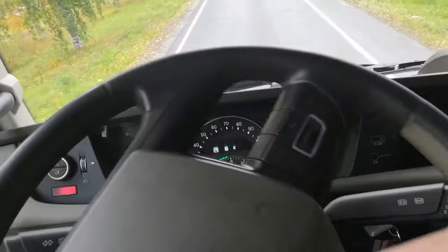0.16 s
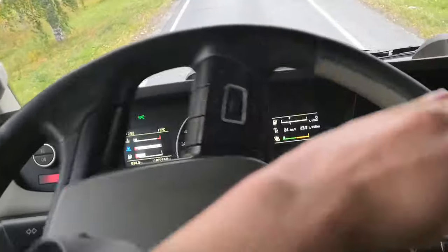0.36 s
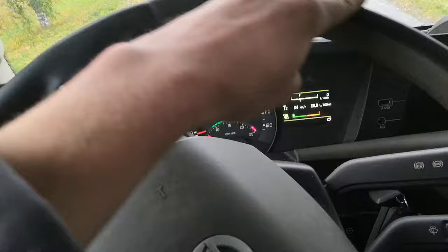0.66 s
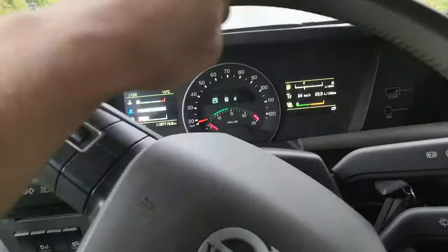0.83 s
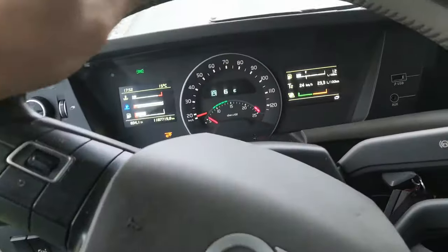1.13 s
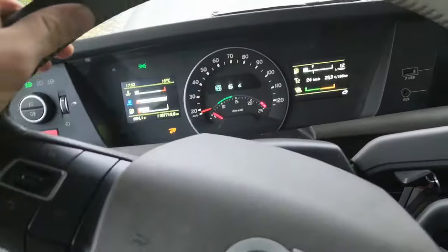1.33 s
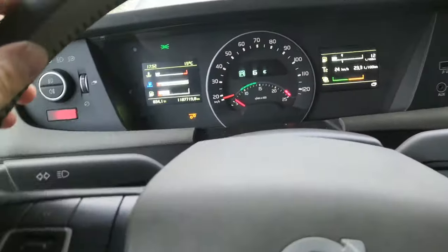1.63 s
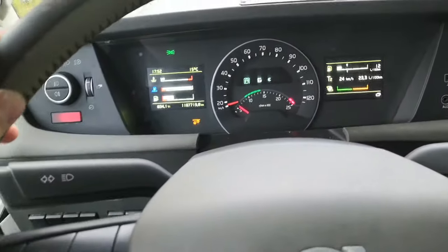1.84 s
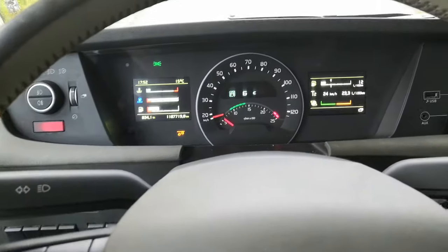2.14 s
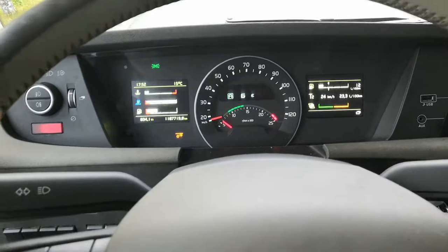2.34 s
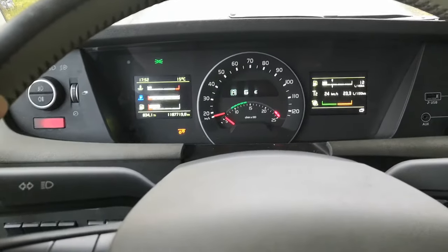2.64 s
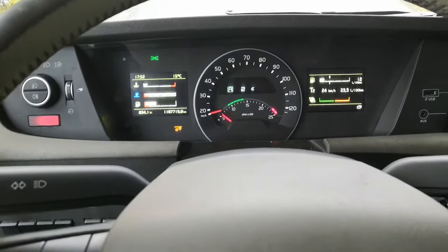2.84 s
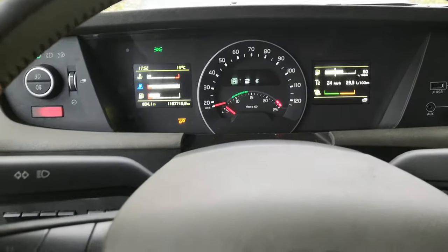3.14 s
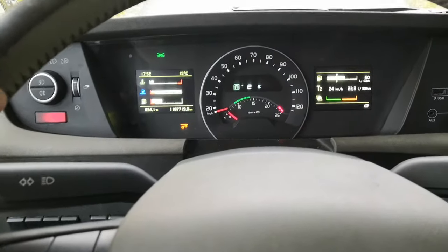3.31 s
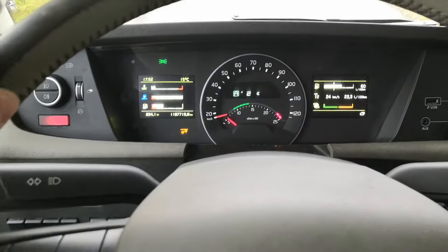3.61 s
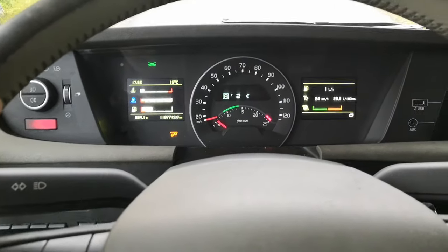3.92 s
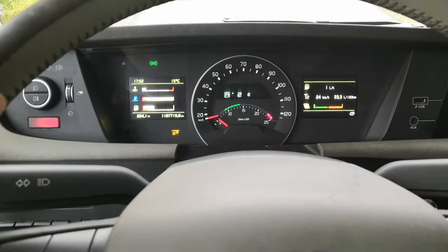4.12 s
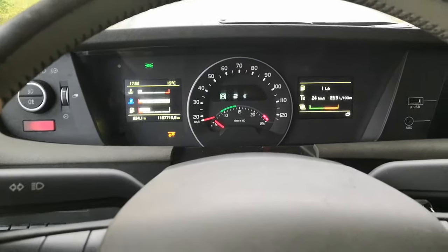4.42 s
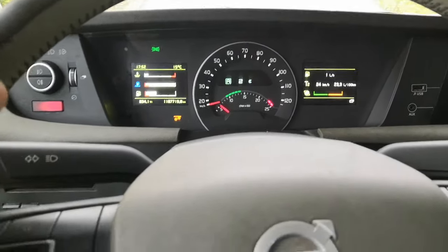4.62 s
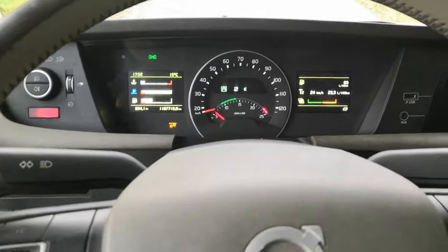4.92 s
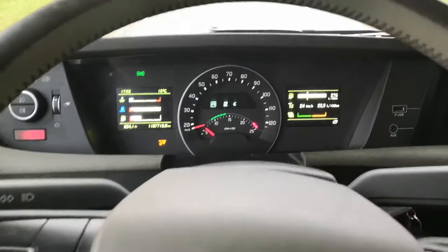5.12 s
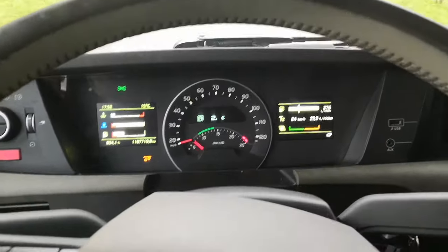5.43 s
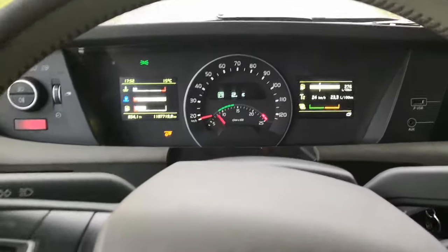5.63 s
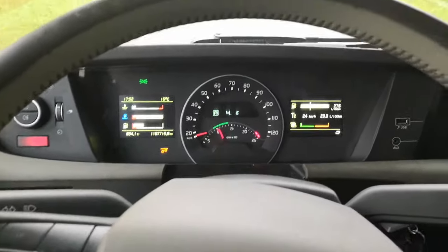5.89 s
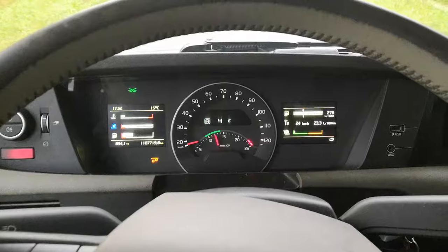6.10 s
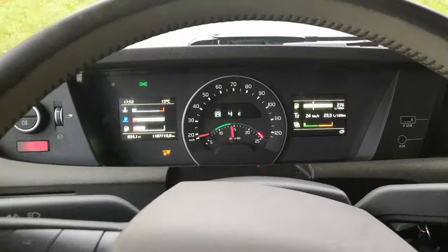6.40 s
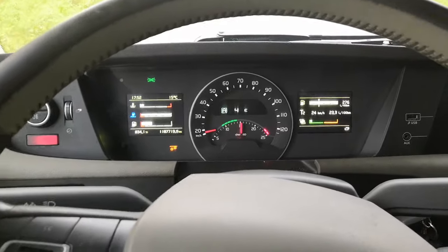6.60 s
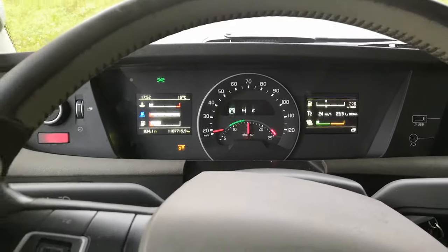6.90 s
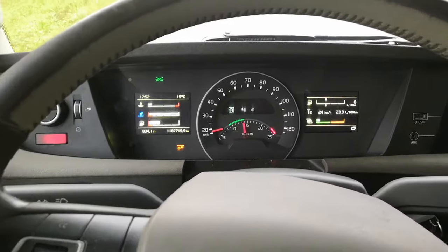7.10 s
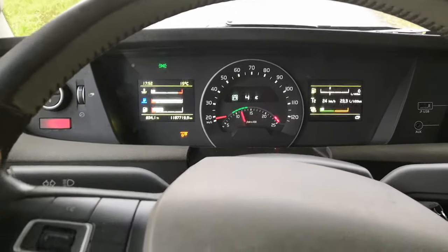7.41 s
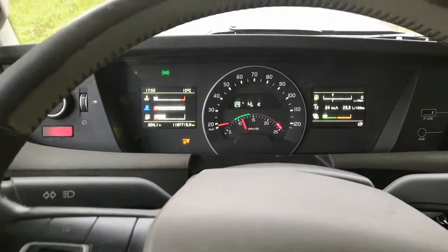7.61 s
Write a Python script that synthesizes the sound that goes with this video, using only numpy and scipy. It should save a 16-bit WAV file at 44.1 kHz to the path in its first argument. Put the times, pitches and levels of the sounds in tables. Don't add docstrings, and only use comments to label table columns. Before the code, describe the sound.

Inside a heavy truck cab, a six-cylinder diesel idles low and lumpy over soft rumble and a steady pump hum. Hands swish on the wheel, a small air puff spits, gear dogs clunk dully. Then the engine rises quickly, booming and knocking, drops for an upshift and climbs again. A sharp finger tap hits the handheld microphone near the left side late on.

```python
import sys
import numpy as np
from scipy import signal
from scipy.io import wavfile
from scipy.ndimage import uniform_filter1d

SR = 44100
rng = np.random.default_rng(int(sys.argv[2]) if len(sys.argv) > 2 else 0)


def file_out(sig):
    cols = np.atleast_2d(sig).T
    lim = np.clip(cols, -1, 1)
    pcm = np.round(lim * 32767).astype(np.int16)
    wavfile.write(sys.argv[1], SR, pcm)


def linear_from_db(decibels):
    return 10 ** (np.asarray(decibels, float) / 20)


N = 341775
T = np.arange(N) / SR


def colour(table, hz):
    f, db = np.transpose(table)
    return np.interp(np.log(np.maximum(hz, 1)), np.log(f), db)


def curves(table):
    s, *columns = np.transpose(table)
    return [np.interp(T, s, c) for c in columns]


def swells(rows):
    return sum(db * np.exp(-((T - s) / length) ** 2) for s, length, db in rows)


def resonance(hz, centre_hz, width_hz):
    return 1 / (1 + ((hz - centre_hz) / (width_hz / 2)) ** 2)


def walk(rate_hz, count):
    k = int(SR / rate_hz)
    held = np.repeat(rng.standard_normal((count, N // k + 1)), k, axis=1)
    slewed = uniform_filter1d(uniform_filter1d(held, k), k)[:, :N]
    return slewed / slewed.std()


def ports(spectrum, modes=(), patchy_db=0.5, size=15, balance=None):
    # frequency in Hz, level in dB.
    side_db = [(60, -28), (110, -21), (200, -17), (380, -6), (700, 4), (1290, 0), (2380, 0), (4400, 0),
               (8120, 0), (15000, 1)]
    # frequency in Hz, level in dB.
    far_balance = [(60, 0.0), (110, 0.0), (200, 0.0), (380, 0.0), (700, 1.0), (1290, -2.0), (2380, -4.5),
                   (4400, -2.0), (7000, -5), (10000, 3), (15000, 0.5)]
    if balance is None:
        balance = far_balance
    frame, overlap = 2048, 1792
    hz, _, z = signal.stft(rng.standard_normal((2, N)), SR, nperseg=frame, noverlap=overlap)
    outside = (hz < spectrum[0][0]) | (hz > spectrum[-1][0])
    db = colour(spectrum, hz) - 80 * outside
    db = db + sum(gain_db * resonance(hz, f, width) for f, width, gain_db in modes)
    patches = uniform_filter1d(rng.standard_normal(z[0].shape), size=size, axis=0)
    patches = uniform_filter1d(patches, size=21, axis=1)
    mid = z[0]
    side = z[1] * linear_from_db(colour(side_db, hz))[:, None]
    lean = linear_from_db(colour(balance, hz) / 2)[:, None]
    pair = np.array([(mid + side) * lean, (mid - side) / lean])
    pair = pair * linear_from_db(db[:, None] + patchy_db * patches / patches.std())
    out = signal.istft(pair, SR, nperseg=frame, noverlap=overlap)[1][:, :N]
    return out / out.mean(axis=0).std()


def lines(tables, wander_db, rate_hz, edge_s=0.045):
    out = np.zeros(N)
    for table, wander in zip(tables, walk(rate_hz, count=len(tables))):
        s, hz, db = np.transpose(table)
        gate = np.clip(np.minimum(T - s[0], s[-1] - T) / edge_s + 1, 0, 1)
        level = linear_from_db(np.interp(T, s, db) + wander_db * wander)
        out += gate * level * np.sin(2 * np.pi * np.cumsum(np.interp(T, s, hz)) / SR)
    return np.sqrt(2) * out


def glides(rows):
    return [[(a, hz0, db), (b, hz1, db)] for a, b, hz0, hz1, db in rows]


def order(k, turns, start=0.0):
    return np.sin(2 * np.pi * (k * turns + start))


def multiples(hz, effort_db):
    # frequency in Hz, width in Hz, lift in dB.
    panels = [(85, 14, 6), (98.5, 14, 15), (159.6, 22, 10.5)]
    levels_db = []
    # multiple, dB at idle, dB per dB of effort, share of the panel lift
    laws = ((3 / 2, -60, 1.4, 0.3), (2, -58, 0.84, 0.97))
    for (k, idle_db, slope, share), waver in zip(laws, walk(9, count=2)):
        lift_db = sum(db * resonance(k * hz, f, width) for f, width, db in panels)
        levels_db.append(idle_db + slope * effort_db + 2.2 * waver + share * lift_db)
    return levels_db


def firing(hz, turns, tone_db, effort_db, clatter_db, lope):
    # centre in seconds, length in seconds, firing tone gain in dB.
    surges = [(.05, 0.11, -10), (.3, .05, 5), (.68, 0.087, -12), (1.55, 0.13, 4), (1.95, 0.19, -3),
              (2.19, 0.045, 4), (2.42, 0.042, 8), (3.0, 0.22, -1.5), (3.5, 0.053, 5), (5.72, .04, -5),
              (5.9, .05, -4), (6.0, .03, 2)]
    # multiple of the firing rate, level in dB against the clatter.
    orders = [(0.499, -5), (2.501, 4), (2.667, 12), (3.001, 0.5), (3.5, 0), (4, 3), (4.501, -2.5),
              (5.002, -7)]
    # frequency in Hz, gain in dB.
    cab_gain = [(20, -2), (150, 9), (210, -16), (260, -4), (310, -22), (420, 2.5)]
    tones_db = [tone_db + 4 * lope + swells(surges), *multiples(hz, effort_db)]
    out = sum(linear_from_db(db) * order(k, turns) for k, db in zip((1, 3 / 2, 2), tones_db))
    load_db = clatter_db + 1.21 * (clatter_db + 32.0)
    count = len(orders)
    for (k, db), wander, start in zip(orders, walk(7, count), rng.random(count)):
        out += linear_from_db(load_db + db + colour(cab_gain, k * hz) + 2.0 * wander) * order(k, turns, start)
    return np.sqrt(2) * out


def idle_orders(turns):
    # multiple of the firing rate, level in dB.
    comb = [(2.333, -61), (2.5, -57), (2.667, -58), (3, -61), (4, -64), (5, -66), (5.667, -64), (6.4, -60),
            (7.4, -67), (7.85, -65), (8.333, -67), (8.5, -67), (9.667, -71), (10, -69), (11, -71),
            (12.5, -71)]
    ends_s, fade_s = 4.5, .4
    fade = np.clip((ends_s - T) / fade_s + 1, 0, 1)
    out = np.zeros(N)
    for (k, db), wander, start in zip(comb, walk(3, len(comb)), rng.random(len(comb))):
        out += linear_from_db(db + 2.5 * wander) * order(k, turns, start)
    return np.sqrt(2) * fade * out


def crossings(turns):
    # multiple of the firing rate, centre in seconds, length in seconds, level in dB.
    passes = [(3.06, 4.85, .3, -49), (2.5, 4.95, .2, -51), (3, 5.5, .12, -45), (4, 5.5, .2, -49),
              (5, 5.65, .25, -52), (6.2, 5.6, .25, -52), (6.55, 5.62, .1, -50), (3.47, 5.76, .09, -43),
              (4.1, 5.87, .05, -44), (3.54, 6.1, .18, -45), (2, 6.35, .2, -48), (2.67, 6.1, .12, -48),
              (3.53, 6.92, .15, -45), (3.55, 7.3, .3, -48), (3.5, 7.68, .1, -45), (5.33, 7.3, .12, -54)]
    count = len(passes)
    out = np.zeros(N)
    for (k, s, length, db), wander, start in zip(passes, walk(8, count), rng.random(count)):
        out += linear_from_db(db + 2.6 * wander) * np.exp(-((T - s) / length) ** 4) * order(k, turns, start)
    return np.sqrt(2) * out


def combustion(turns, clatter_db, effort_db):
    # frequency in Hz, density in dB per Hz.
    idle_colour = [(500, -12.5), (850, -6), (1110, -6), (1280, -6), (1540, -6.5), (1940, -6.5),
                   (2090, -7.5), (2820, -12.5), (3230, -22), (3490, -21.5), (4000, -30), (5200, -66),
                   (8800, -120)]
    pull_colour = [(500, -20), (850, -4), (968, -0.5), (1160, -5.5), (1300, -1.5), (1420, -7.5), (1610, -3),
                   (1830, -4.5), (2430, -6), (3030, -17.5), (4000, -25), (5200, -43), (8800, -120)]
    hiss_colour = [(1940, -41), (3300, -13), (3450, -1.5), (3760, -4.5), (4290, -4), (5010, -3), (5250, -3),
                   (5690, -3), (6190, -6.5), (6320, -9), (6850, -4.5), (8590, -13.5), (11000, -16.5),
                   (14300, -29), (22000, -120)]
    # frequency in Hz, width in Hz, dB over the clatter.
    idle_rings = [(1290, 45, 4), (1620, 50, 5), (1905, 30, 7), (1955, 30, 8)]
    pull_rings = [(1290, 60, 2), (1615, 80, 4), (2480, 90, 3)]
    cylinder_gain = linear_from_db(2.5 * rng.standard_normal(int(turns[-1]) + 2))
    strength = cylinder_gain[turns.astype(int)]
    knock = 1 + 0.92 * strength * np.exp(-(turns % 1) / 2.6)
    load = np.clip((clatter_db + 58) / 7, 0, 1)
    idle = ports(idle_colour, idle_rings, patchy_db=.9)
    pull = ports(pull_colour, pull_rings, patchy_db=.9)
    block = (np.sqrt(1 - load) * idle + np.sqrt(load) * pull) * knock
    hiss_db = -77.5 + 0.66 * effort_db
    hiss = ports(hiss_colour, patchy_db=.4)
    return linear_from_db(clatter_db) * block / block.mean(axis=0).std() + linear_from_db(hiss_db) * hiss


def mesh(hz, turns):
    # centre in seconds, length in seconds, gain in dB.
    tooth_load = [(5.73, .06, 8), (5.92, .04, 8), (6.8, .06, -8), (6.905, .015, 5), (6.955, .025, 6),
                  (7.02, .025, -6), (7.09, .025, 8), (7.15, .02, -7), (7.26, .06, 1), (7.41, .06, -10),
                  (7.52, .025, 8), (7.555, .012, -4), (7.59, .03, 6), (7.645, .015, -5), (7.69, .04, 6)]
    teeth = 42.3
    ring = resonance(teeth * hz, 2470, 460)
    level = linear_from_db(-68.5 + swells(tooth_load) + 1.6 * walk(25, count=1)[0])
    return np.sqrt(2) * level * ring * order(teeth, turns)


def whistles(hz, turns):
    # start in seconds, end in seconds, start in Hz, end in Hz, level in dB.
    whine = [(6.15, 6.62, 2450, 2460, -69)]
    # time in seconds, frequency in Hz, level in dB.
    squeak = [
        [(5.03, 5700, -90), (5.09, 6200, -88), (5.13, 6600, -83), (5.16, 6950, -80), (5.2, 6760, -81),
         (5.24, 7080, -79), (5.285, 6580, -79)],
    ]
    turbine = [
        [(6.78, 5340, -88), (6.86, 5390, -84), (6.88, 5380, -86)],
        [(7.14, 5420, -86), (7.19, 5720, -87), (7.215, 5830, -85), (7.25, 5600, -89)],
    ]
    tones = lines(glides(whine) + squeak + turbine, wander_db=2.2, rate_hz=30, edge_s=.012)
    return (tones + mesh(hz, turns)) * linear_from_db(np.array([[2], [4.5]]))


def shaft():
    # start in seconds, end in seconds, start in Hz, end in Hz, level in dB.
    bites = [(6.38, 6.56, 204, 209, -42), (7.17, 7.52, 218.9, 218.9, -46), (7.1, 7.55, 144.7, 144, -46),
             (7.15, 7.55, 251, 251, -50)]
    return lines(glides(bites), wander_db=1.5, rate_hz=8.2)


def shudder():
    # frequency in Hz, density in dB per Hz.
    pan_colour = [(300, -20), (335, -4), (365, 0), (395, -1), (425, -20)]
    centre_s, length_s, db = 5.56, .2, -47
    return ports(pan_colour, size=3) * linear_from_db(db) * np.exp(-((T - centre_s) / length_s) ** 2)


def strike(hits, modes, contact_s):
    t = T[:SR // 4]
    blows = sum(linear_from_db(db) * np.exp(-((T - s) / .0002) ** 2) / 16 for s, db in hits)
    out = []
    for lag_s in (0, -.0004):
        ring = np.zeros(len(t))
        for hz, db, t60 in modes:
            decay = np.exp(-np.log(1000) * t / t60) * (1 - np.exp(-t / contact_s))
            ring += linear_from_db(db) * decay * np.sin(2 * np.pi * hz * (t + lag_s))
        out.append(signal.fftconvolve(blows, ring)[:N])
    return np.array(out)


def clunk():
    # time in seconds, level in dB.
    dogs = [(3.2028, -48), (3.2145, -42), (3.2204, -39), (3.2322, -41), (3.2439, -42), (3.2616, -41)]
    lid_blows = [(3.2145, -38), (3.26, -45)]
    # frequency in Hz, level in dB, t60 in seconds.
    box_modes = [(168, 0, .17), (184, 0, .12), (215, -5, .1), (610, -10, .06), (680, -19, .05),
                 (750, -18, .05), (940, -8, .04), (1450, -8, .03), (1900, -8, .025)]
    lid_modes = [(185, 0, .15), (232, -4, .15), (258, -3, .15), (308, 0, .2), (388, -9, .15),
                 (443, -5, .12), (470, -10, .1), (515, -10, .1), (535, -9, .12), (672, -13, .1),
                 (945, -13, .08)]
    return strike(dogs, box_modes, contact_s=.0003) + strike(lid_blows, lid_modes, contact_s=.006)


def close_air():
    # frequency in Hz, width in Hz, lift in dB.
    nozzle = [(3580, 760, 7), (5000, 5100, 9), (7500, 520, 9), (9550, 710, 3.5)]
    # frequency in Hz, level in dB.
    near_balance = [(1200, -2), (4500, -3.5), (7000, -8.5), (8300, 1), (10000, 18), (12500, 3), (15800, 5)]
    jet_colour = [(1200, -3), (4000, 0), (11000, -2), (15800, -9)]
    air = ports(jet_colour, nozzle, patchy_db=1.2, balance=near_balance)
    return air * linear_from_db(2.0 * walk(350, count=1))


def bursts(air, rows, octaves, rise_s=None):
    out = np.zeros((2, N))
    for s, length, db, hz, pan_db in rows:
        a, b = max(int((s - .6) * SR), 0), min(int((s + .6) * SR), N)
        t = T[a:b] - s
        swell = np.exp(-(t / np.where(t < 0, rise_s or length, length)) ** 2)
        steepness = 5 if hz < 3000 else 2
        edges_hz = [hz / 2 ** (octaves / 2), hz * 2 ** (octaves / 2)]
        band = signal.butter(steepness, edges_hz, "band", fs=SR, output="sos")
        jet = signal.sosfilt(band, air[:, a:b])
        pan = np.array([[pan_db], [-pan_db]]) / 2
        out[:, a:b] += jet / jet.std() * swell * linear_from_db(db + 9.5 + pan)
    return out


def puffs(air):
    # centre in seconds, length in seconds, level in dB, centre in Hz, left minus right in dB.
    vents = [(0.17, 0.06, -79, 4840, -14), (0.16, 0.088, -86, 8400, 9), (0.51, 0.17, -83.5, 5500, -2),
             (1.751, .009, -63.5, 7500, 6), (1.752, .009, -65, 4890, 2), (1.785, .014, -66.5, 4800, 0),
             (1.767, .006, -72, 5200, 0), (1.767, .006, -72, 7400, 0), (1.783, .014, -66, 7600, 0),
             (1.76, .012, -69, 3700, 4), (1.793, .01, -70, 3800, 4), (1.803, .005, -71, 7400, 0),
             (1.765, .025, -74, 9400, 0), (1.765, 0.067, -70.5, 2170, -2), (3.19, 0.018, -69.5, 6000, 0),
             (4.6, 0.042, -80, 7300, -1), (5.3, 0.01, -72, 2420, 1), (.122, .004, -76, 4500, -8),
             (.138, .005, -80, 4600, -6), (.2, .022, -80, 5200, -7), (0.096, .012, -81, 5000, -8),
             (1.718, .014, -76, 7700, 0), (1.717, 0.008, -78, 4500, -4), (8.3, .06, -69, 2460, 0)]
    return bursts(air, vents, octaves=0.29)


def hands(air):
    # centre in seconds, length in seconds, level in dB, centre in Hz, left minus right in dB.
    swishes = [(0.167, 0.22, -78.5, 4900, -7.5), (5.35, 0.17, -80, 5940, -2),
               (1.066, .025, -81.5, 8400, -1), (1.216, 0.03, -75.5, 8540, -3), (1.327, 0.055, -69, 8160, 0),
               (1.35, 0.096, -80, 2280, 2), (1.442, 0.021, -79, 9060, -3), (1.964, .0045, -81, 8000, 3),
               (3.018, 0.0063, -76.5, 6490, -4), (3.197, .019, -76, 7000, -5), (3.3, .15, -87.5, 5000, 4),
               (4.655, 0.004, -67.5, 7500, -9), (4.686, 0.038, -68.5, 7960, 2),
               (4.553, 0.13, -78.5, 5000, 2), (4.84, 0.043, -73, 9620, 4), (4.898, 0.034, -68, 7500, -2),
               (4.963, 0.029, -74, 6000, 1), (5.657, 0.041, -68, 5760, -2.5), (7.749, .003, -76, 8800, -4)]
    flicks = [(1.416, .005, -73, 9500, -3), (1.7435, 0.013, -63, 5500, -9), (5.564, .005, -69, 5000, -6),
              (5.578, 0.031, -69, 5000, -10), (5.632, 0.015, -58.5, 7000, -7)]
    return bursts(air, swishes, octaves=1.32) + bursts(air, flicks, octaves=1.32, rise_s=.002)


def low_flicks(air):
    # time in seconds, length in seconds, level in dB, centre in Hz, left minus right in dB.
    ticks = [(1.743, .012, -64, 2100, -2), (3.208, .03, -64, 1500, 4), (4.652, .005, -57.5, 2100, -8),
             (5.564, .006, -59, 2580, -4), (5.581, .01, -55.5, 2200, -1), (5.626, 0.03, -52, 1950, 0),
             (5.683, 0.0067, -55, 1600, 0), (5.834, 0.014, -54.5, 2310, 3), (4.5, 0.014, -61.5, 1190, 3),
             (4.897, 0.033, -67.5, 2430, 0), (4.962, .008, -64, 2400, 2), (5.089, 0.022, -61.5, 1700, -3)]
    return bursts(air, ticks, octaves=.7, rise_s=.002)


def block_walls(air):
    # centre in seconds, length in seconds, level in dB, centre in Hz, left minus right in dB.
    rings = [(4.51, 0.061, -71, 1934, -8), (4.85, 0.069, -75, 1925, -2), (5.076, .05, -68, 2010, 0),
             (5.45, .08, -67, 1513, 0), (5.53, 0.18, -63.5, 1610, -3), (5.72, .05, -67, 1660, 0),
             (6.3, 0.28, -65.5, 1291, 1), (6.17, .04, -65, 1606, 0), (6.4, 0.15, -65, 1680, 0)]
    return bursts(air, rings, octaves=.07)


def tap(t):
    def push(t, rise_s, fall_s):
        return np.where(t > 0, (1 - np.exp(-np.abs(t) / rise_s)) * np.exp(-np.abs(t) / fall_s), 0)

    def bump(t, length_s):
        return np.exp(-(t / length_s) ** 2)

    sag = .07 * push(t - .003, .0056, .021)
    press = .2 * bump(t + .00035, .00013) + .09 * bump(t + .0009, .0005)
    left = 1.15 * push(t, .00002, .00011) + .6 * push(t, .00005, .0015) + press - sag
    right = .68 * push(t - .0005, .0004, .0019) + .11 * bump(t - .0003, .0009) - sag
    membrane = signal.bessel(3, 4800, fs=SR, norm="mag", output="sos")
    nail = linear_from_db(-41) * bump(t, .00015) * np.cos(2 * np.pi * 12500 * t) * np.array([[1], [.05]])
    return signal.sosfilt(membrane, np.array([left, right])) + nail


def limiter(t):
    ahead_s, release_s = .005, .02
    duck = np.clip(t / ahead_s + 2, 0, 1) * np.exp(-np.maximum(t, 0) / release_s)
    return linear_from_db(-9 * duck)


def hum():
    # time in seconds, frequency in Hz, level in dB.
    upper = [(0, 210, -48), (.7, 210.6, -48), (2.9, 210, -47.5), (3.2, 208, -48.5), (4.0, 208.5, -48.5),
             (4.55, 214.7, -48), (4.92, 215.5, -45), (5.16, 216.5, -56)]
    lower = [(s, hz * .691, db - 5.5) for s, hz, db in upper]
    return lines([upper], wander_db=1.4, rate_hz=8.9) + lines([lower], wander_db=1.5, rate_hz=8.2)


def road_boom(effort_db):
    # frequency in Hz, density in dB per Hz.
    boom_colour = [(8.8, -35), (15, -15), (43, 2.5), (102, 11), (140, -16.5), (180, -33), (310, -120)]
    # frequency in Hz, width in Hz, lift in dB.
    cab_modes = [(16, 21, 15), (73.8, 21, 10.5)]
    # centre in seconds, length in seconds, gain in dB.
    lurches = [(.28, 0.06, 6.5), (.9, 0.051, 8.5), (2.5, 0.069, 5), (3.33, 0.098, 6), (4.12, 0.1, 5.5),
               (4.5, 0.087, 3), (5.07, 0.059, 13), (5.54, 0.09, 12), (5.76, 0.065, 5.5), (6.03, 0.039, 5.5),
               (6.25, 0.22, -2), (6.85, 0.09, 2.5), (7.0, 0.12, 4), (7.25, 0.12, 10.5), (7.5, 0.13, 6.5)]
    return ports(boom_colour, cab_modes, patchy_db=2.0, size=2) * linear_from_db(effort_db - 49.5 + swells(lurches))


def tyre_drone(effort_db):
    # frequency in Hz, density in dB per Hz.
    drone_colour = [(76, -34), (130, -9), (167, -7), (214, -12), (235, -6.5), (259, -12.5), (387, -16),
                    (505, -26.5), (581, -23), (785, -27.5), (950, -31.5), (1240, -40), (2090, -120)]
    rolling_db = np.where(T > 6.9, 2, 0)
    return ports(drone_colour, patchy_db=1.25, size=3) * linear_from_db(effort_db - 52 + rolling_db)


def scene():
    # time in seconds, firing rate in Hz.
    speed = [(0, 30.05), (3.0, 30.0), (4.2, 30.0), (4.6, 30.7), (5.05, 32), (5.18, 36), (5.48, 48.5),
             (5.7, 58.4), (5.95, 67.3), (6.19, 75.5), (6.5, 80.4), (6.67, 73.7), (6.87, 62.7), (7.12, 57.2),
             (7.18, 54.9), (7.33, 54.3), (7.47, 54.5), (7.75, 64.3)]
    # time in seconds, combustion in dB, firing tone in dB.
    effort = [(0, -60, -43.5), (4.3, -59.5, -42), (4.55, -57, -36), (5.11, -57, -34), (5.19, -58, -52),
              (5.27, -53, -34), (5.46, -50.5, -34), (5.52, -49.5, -39), (5.62, -48.5, -32.5),
              (6.08, -49, -37.5), (6.26, -49, -31.5), (6.45, -48, -40), (6.6, -52, -41), (6.76, -51, -27),
              (6.84, -52, -32), (6.9, -52.5, -54), (7.12, -56, -54), (7.33, -53.5, -44), (7.7, -51, -33)]
    hz, = curves(speed)
    clatter_db, tone_db = curves(effort)
    turns = np.cumsum(hz) / SR
    effort_db = clatter_db + 60
    lope = np.cos(2 * np.pi * 2.05 * (T - .3)) * np.clip((4.0 - T) / .4, 0, 1)
    clatter_db = clatter_db + .8 * lope
    cab = firing(hz, turns, tone_db, effort_db, clatter_db, lope) + idle_orders(turns) + crossings(turns)
    cab = cab + combustion(turns, clatter_db, effort_db) + whistles(hz, turns)
    cab = cab + shaft() + shudder() + clunk()
    air = close_air()
    cab = cab + puffs(air) + hands(air) + low_flicks(air) + block_walls(air)
    cab = cab + hum() + road_boom(effort_db) + tyre_drone(effort_db)
    since_tap_s = T - 6.59106
    return cab * limiter(since_tap_s) + tap(since_tap_s)


def top_cut(x):
    return signal.sosfilt(signal.butter(12, 15760, fs=SR, output="sos"), x)


def record(dry):
    # frequency in Hz, density in dB per Hz.
    self_noise = [(3000, -2), (9000, -4), (11000, -5.5), (15800, -1.5)]
    hiss = linear_from_db(-83.5) * ports(self_noise, patchy_db=.8)
    return top_cut(dry + hiss)


dry = scene()
out = record(dry)
file_out(out)
```